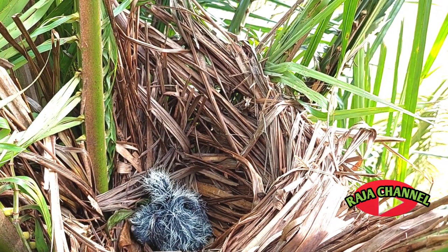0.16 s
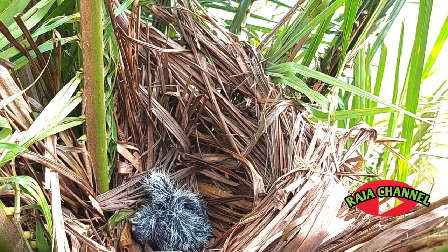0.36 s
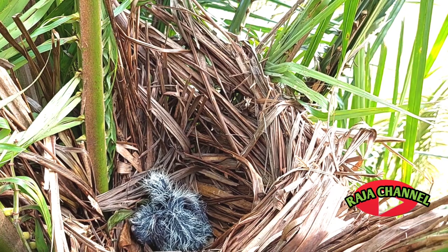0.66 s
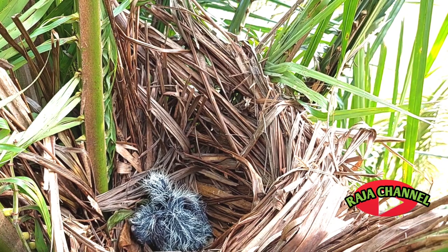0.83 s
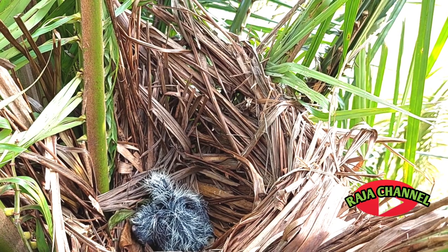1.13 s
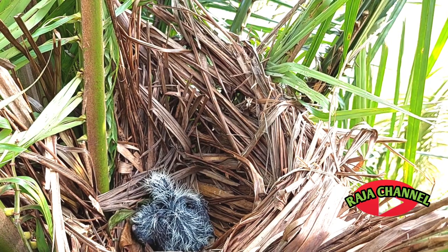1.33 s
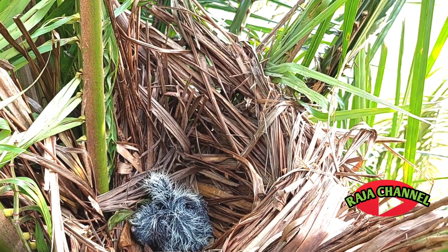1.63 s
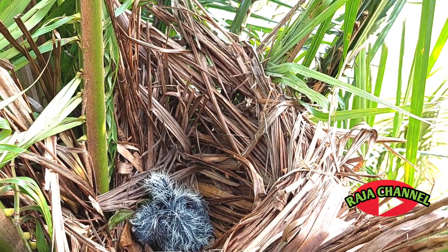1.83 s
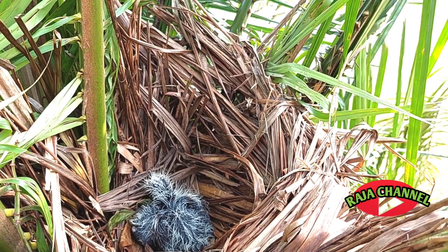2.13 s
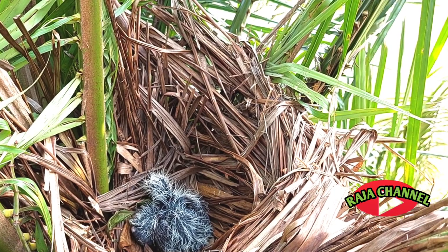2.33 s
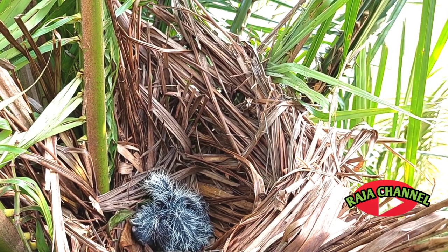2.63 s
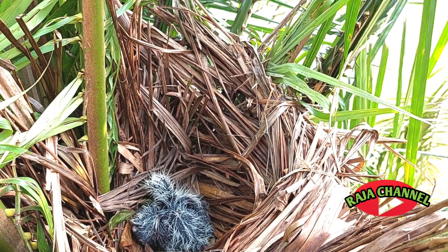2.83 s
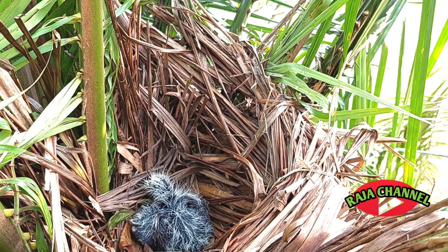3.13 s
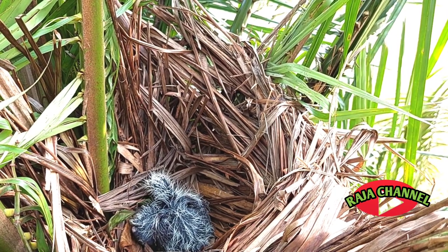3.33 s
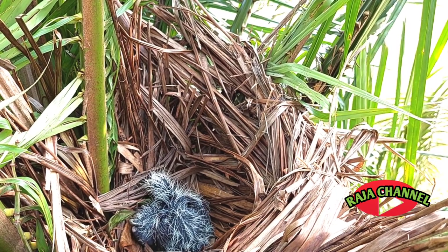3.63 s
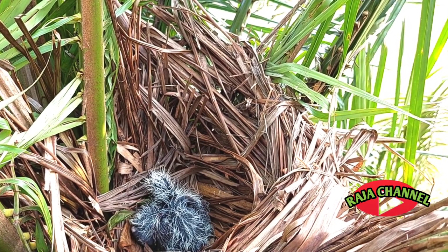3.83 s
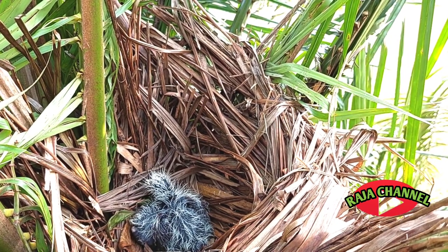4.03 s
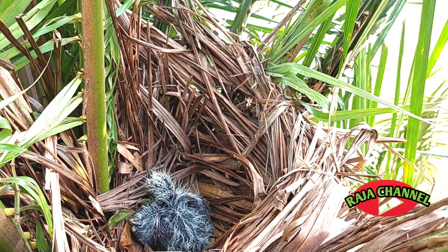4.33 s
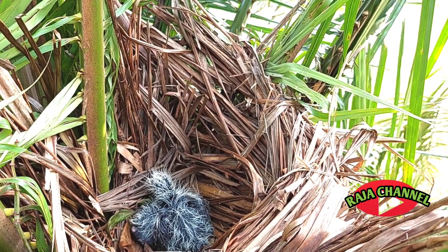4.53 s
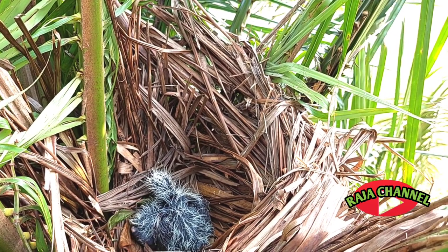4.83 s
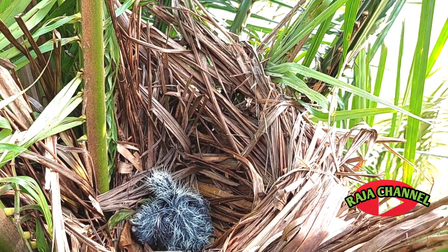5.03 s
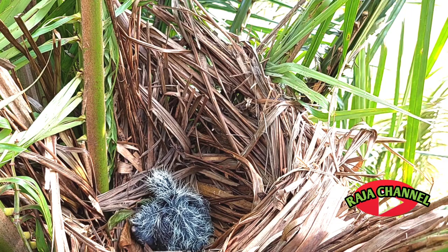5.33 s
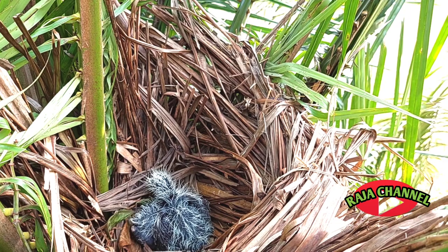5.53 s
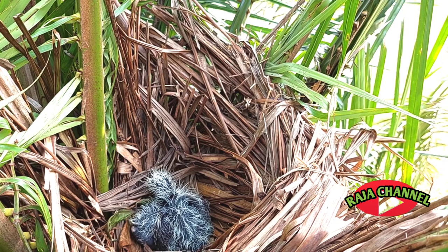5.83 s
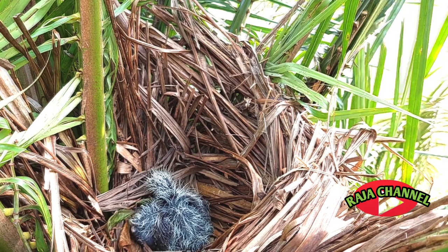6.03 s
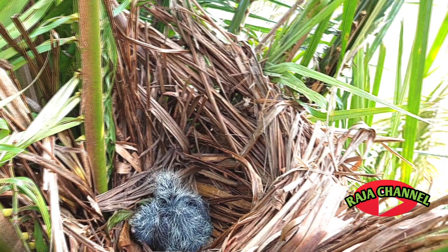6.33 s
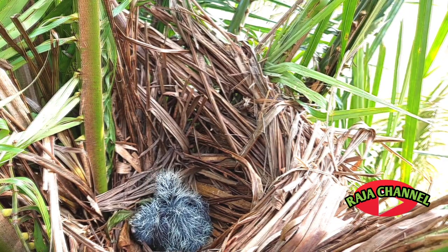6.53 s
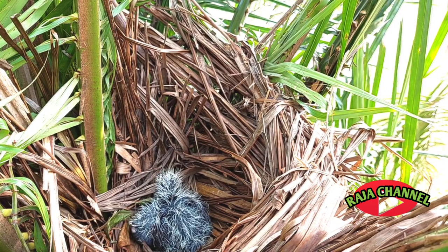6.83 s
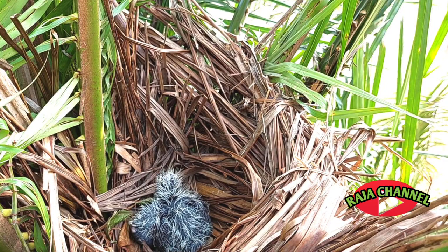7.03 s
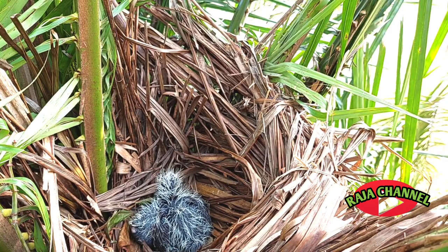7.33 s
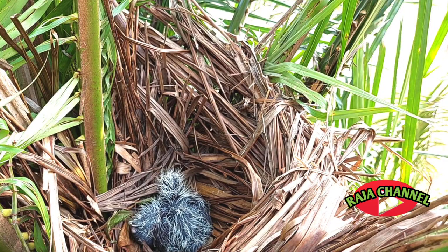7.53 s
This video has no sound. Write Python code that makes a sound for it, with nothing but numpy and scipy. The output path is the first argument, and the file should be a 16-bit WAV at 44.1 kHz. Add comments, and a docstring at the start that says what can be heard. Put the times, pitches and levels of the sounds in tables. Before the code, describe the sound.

Bright daytime thicket of shrill pulsing insects, with quickening runs of bird ticks, high double lisps, a few sharp dry crackles and faint low rumble.

```python
"""Palm thicket by day: two crickets chirp and a katydid buzzes in swelling phrases, all wing-stroke tone pulses.
One bird ticks in quickening runs, another lisps, others call from deeper in: gliding tones with tree echo.
Dry fronds snap and stems knock: decaying noise bursts. Behind lie trillers and a pulsing noise chorus,
then a low distant rumble with a wavering drone and a faint hiss of leaves."""
import sys
import numpy as np
from scipy import signal
from scipy.fft import rfft, irfft, next_fast_len
from scipy.io import wavfile
from scipy.ndimage import map_coordinates

SR = 44100
rng = np.random.default_rng(int(sys.argv[2]) if len(sys.argv) > 2 else 0)


def dump_mix(stems):
    """Bounce the given channels to the path in sys.argv[1] as a 16-bit WAV at rate SR."""
    frames = np.atleast_2d(stems).T  # one column per channel
    limited = np.clip(frames, -1, 1)  # hard clip at full scale
    pcm = np.round(limited * 32767).astype(np.int16)
    wavfile.write(sys.argv[1], SR, pcm)


N = 338247
TIME = np.arange(N) / SR


def amp(db):
    """Decibels to gain."""
    return 10 ** (np.asarray(db) / 20)


def unit(x):
    """Scale to rms 1."""
    return x / np.sqrt(np.mean(x ** 2) + 1e-20)


def along(points, hz):
    """Interpolate (f/Hz, value) points on a log frequency axis."""
    point_hz, values = np.transpose(points)
    return np.interp(np.log(hz + 1), np.log(point_hz + 1), values)


def curve(points):
    """Interpolate (t/s, value) points, one value per sample."""
    return np.interp(TIME, *np.transpose(points))


def wobble(rate_hz):
    """Smooth random curve with rate_hz knots a second."""
    knots = rng.standard_normal(int(N * rate_hz / SR) + 4)
    return map_coordinates(knots, [TIME * rate_hz])


def gate(start_s, end_s, edge_s):
    """Gain 1 between start and end, with linear edges centred on them."""
    return np.clip(np.minimum(TIME - start_s, end_s - TIME) / edge_s + .5, 0, 1)


def filtered(x, response):
    """Filter x by a gain that is a function of frequency."""
    m = next_fast_len(len(x) + 8192)
    return irfft(rfft(x, m) * response(np.fft.rfftfreq(m, 1 / SR)), m)[:len(x)]


def noise(spectrum):
    """Coloured noise of rms 1."""
    return unit(filtered(rng.standard_normal(N), lambda hz: amp(along(spectrum, hz))))


def band(centre_hz, octaves, size=N):
    """Noise of rms 1 in a band that is bell-shaped over log frequency."""
    def bell(hz):
        return np.exp(-.5 * (np.log2((hz + 1) / centre_hz) / octaves) ** 2)
    return unit(filtered(rng.standard_normal(size), bell))


def add(track, s, sound):
    """Mix a sound into the track from time s, cropped to the track."""
    i = round(s * SR)
    part = sound[max(-i, 0):max(N - i, 0)]
    track[max(i, 0):][:len(part)] += part


def echoed(x, echo_db):
    """Direct sound plus diffuse echo from the trees: noise whose decay depends on frequency."""
    # echo decay: f/Hz, t60/s
    trees = [(500, 0.37), (3000, 0.42), (10000, 0.072)]
    hz, t, z = signal.stft(rng.standard_normal(SR // 2), SR, nperseg=256)
    decay = amp(-60 * t / along(trees, hz)[:, None])
    tail = signal.istft(z * decay, SR)[1]
    path = amp(echo_db) * tail / np.linalg.norm(tail)
    path[0] += 1  # direct sound
    return signal.fftconvolve(x, path)


def lull(depth=1):
    """Gain of the lull that most of the insects share; depth scales its dB."""
    # lull at depth 1: t/s, level/dB
    lull_db = [(5.8, 0), (6.15, -1.8), (6.55, -6.8), (6.85, -5.8), (7.35, 0)]
    return amp(depth * curve(lull_db))


def wings(hz, rate, glide_hz, sharp, rough, octaves, drift=0.028, jitter=.007, uneven_db=1.0):
    """Stridulation of rms 1: each wing stroke is a gliding tone pulse, roughened by the file's uneven teeth."""
    stroke = np.cumsum(rate * (1 + drift * wobble(12))) / SR % 1  # position in the stroke, 0-1
    pulse = np.abs(np.sin(np.pi * stroke)) ** sharp * amp(uneven_db * wobble(rate))
    pitch_hz = hz * (1 + jitter * wobble(rate)) + glide_hz * (stroke - .5)
    tone = np.sqrt(2) * np.sin(2 * np.pi * np.cumsum(pitch_hz) / SR)
    return unit(pulse * (tone + rough * band(hz, octaves)))


def chirps(bouts, period_s, length_s, edge_s, vary_db=.3):
    """Level of flat-topped chirps, evenly spaced through each bout."""
    level = np.zeros(N)
    for first, last, db in bouts:
        count = round((last - first) / period_s) + 1
        for s in np.linspace(first, last, count):
            chirp_gain = amp(db + vary_db * rng.standard_normal())
            level += chirp_gain * gate(s - length_s / 2, s + length_s / 2, edge_s)
    return level


def crickets():
    """Two near crickets chirp, each at its own pace; the shrill one keeps stroking softly between chirps."""
    # chirp bouts: first chirp t/s, last chirp t/s, relative level/dB
    high_bouts = [(.036, 1.752, -42.7), (1.933, 6.461, -43.4), (6.62, 7.02, -52)]
    low_bouts = [(.11, 1.532, -48.6), (2.108, 2.93, -49.5), (3.31, 3.948, -49.6), (4.21, 5.63, -49),
                 (5.865, 7.62, -49.3)]
    high_period_s, low_period_s = .133, .16
    shrill = wings(7045, rate=97, glide_hz=700, sharp=2.5, rough=.45, octaves=.04,
                   drift=.06, jitter=.009, uneven_db=.9)
    rattle = wings(5490, rate=89, glide_hz=-750, sharp=3.5, rough=.7, octaves=.08,
                   drift=.02, jitter=.02, uneven_db=1)
    high = amp(-4.0) * chirps(high_bouts, high_period_s, length_s=0.074, edge_s=0.035)
    high += amp(-19) * chirps(high_bouts, high_period_s, length_s=0.25, edge_s=0.044)  # soft strokes between
    low = amp(.2) * chirps(low_bouts, low_period_s, length_s=0.074, edge_s=0.027)
    return echoed(lull() * (high * shrill + low * rattle), echo_db=-9)[:N]


def katydid():
    """Each phrase of very even strokes starts softly, swells and stops dead."""
    # phrases: start t/s, end t/s
    phrases = [(-.25, .058), (.636, .939), (1.253, 1.603), (2.032, 2.352), (2.659, 3.011), (3.293, 3.648),
               (3.92, 4.284), (4.566, 4.902), (5.236, 5.595), (5.873, 6.243), (6.473, 6.86)]
    base_db, lull_depth = -47.8, 1.4
    level = np.zeros(N)
    for start, end in phrases:
        swell_db = np.interp(TIME - start, [0, .08, .15], [-11, -6.5, 0.5])
        level += amp(base_db + swell_db) * (TIME > start) * (TIME < end)
    buzz = wings(11280, rate=143, glide_hz=-500, sharp=1.8, rough=.3, octaves=.04,
                 drift=.008, jitter=.004, uneven_db=.5)
    rasp = amp(-9.5) * band(10780, octaves=0.026)  # the wing also scrapes just under its resonance
    return echoed(level * lull(lull_depth) * (buzz + rasp), echo_db=-16)[:N]


def whistle(shape, ratio=1, vary=0.00812, overtone_db=-60, order=2):
    """One bird note gliding through its shape, with slight random pitch offset and one weak overtone."""
    s, hz, db = np.transpose(shape)
    t = np.arange(s[0], s[-1], 1 / SR)
    pitch_hz = np.interp(t, s, hz) * ratio * (1 + vary * rng.standard_normal())
    phase = 2 * np.pi * np.cumsum(pitch_hz) / SR
    tone = np.sin(phase) + amp(overtone_db) * np.sin(order * phase)
    return np.sqrt(2) * amp(np.interp(t, s, db)) * tone


def tick_times(climax, opening_gap, after_gap, count=20):
    """Ticks quicken into a rush up to the climax, then slow down one by one."""
    rush_gap_s, rush_ticks, quicken_ticks = .034, 5.83, 2.47  # rush gap, ticks in rush, ticks to reach it
    tire_s = .0013  # growth of each gap after the climax
    k = np.arange(count)
    gaps_before = np.interp(k, [rush_ticks, rush_ticks + quicken_ticks], [rush_gap_s, opening_gap])
    before = np.cumsum(gaps_before)
    after = np.cumsum(after_gap + tire_s * k)
    return climax + np.concatenate([-before[::-1], [0], after])


def ticking_bird():
    """Runs of falling ticks; toward the loud peak of a run a higher lead-in note joins each tick."""
    # runs: start t/s, climax t/s, end t/s, opening gap/s, first gap after climax/s, opening relative level/dB
    runs = [(-.1, -.492, .26, .05, .047, -60), (.74, 1.116, 1.74, .039, .0475, -62),
            (2.42, 2.8905, 3.72, .053, .0489, -60), (3.73, 4.1485, 4.43, .0573, .0472, -55),
            (5.44, 5.777, 6.44, .0423, .0463, -63.5), (6.47, 7.324, 7.68, .0554, .0512, -59.5),
            (6.44, 7.46, 7.1, .06, .05, -63.5)]
    # relative level of every run: t from climax/s, level/dB
    run_level = [(-.13, -48), (-.03, -45.5), (.1, -50), (.8, -55)]
    # note shapes, before gain and pitch ratio: t/s, f/Hz, level/dB
    tick = [(-.013, 3420, -27), (-.005, 3290, -9), (0, 3213, -4), (.004, 3100, -6.5), (.01, 2900, -33)]
    lead_in = [(0, 3640, -24), (.003, 3540, -3), (.009, 3430, -4), (.014, 3450, -24)]
    swell_s = .33  # swell starts this long before the climax
    track = np.zeros(N)
    for start, climax, end, opening_gap, after_gap, opening_db in runs:
        times = tick_times(climax, opening_gap, after_gap)
        course = np.transpose([(-swell_s, opening_db), *run_level])
        levels_db = np.interp(times - climax, *course) + .5 * rng.standard_normal(len(times))
        for s, db in zip(times, levels_db):
            if start < s < end:
                note = whistle(tick, ratio=1.007, vary=.008, overtone_db=-19.5, order=3)
                add(track, s + tick[0][0], amp(db + .7) * note)
                effort = np.clip((db + 53.5) / 8, 0, 1)
                add(track, s - .016, amp(db - 5.5) * effort * whistle(lead_in))
    return echoed(track, echo_db=-12)[:N]


def songbirds():
    """High lisps close by; a repeated warble, low whistled calls and faint slurs further off."""
    # double lisps: t/s, relative level/dB
    lisps = [(0.27, -48.5), (0.799, -44), (1.31, -45.5), (1.906, -45.5), (2.457, -45), (2.914, -46),
             (3.447, -43.5), (3.985, -42.5), (4.5, -43.5), (5.09, -43), (5.637, -44.5), (6.158, -46.5),
             (6.65, -51)]
    # warbled phrases: t/s, relative level/dB, pitch ratio
    warbles = [(1.155, -60.5, 1.05), (1.508, -58.5, 0.96), (1.864, -61, 0.95), (2.224, -62, 0.94),
               (2.59, -61, .99), (2.974, -63, 0.97)]
    # whistled calls, long from afar, brief from nearer: t/s, motif, relative level/dB, echo level/dB
    whistles = [(.226, "long", -63, -.5), (3.365, "long", -64, -.5), (5.437, "brief", -44.6, -13),
                (6.944, "brief", -52, -12)]
    # motifs: t from start/s, note shape, relative level/dB, pitch ratio
    motifs = {"long": [(0, "waver", 1, .985), (.147, "short", -2.5, .945), (.22, "waver", -5, .97),
              (.297, "short", -2, .95), (.403, "arch", -1, .995), (.59, "arch", -.5, .985)],
              "brief": [(0, "waver", -1.5, .99), (.169, "short", .5, .98), (.26, "arch", 0, 1)]}
    # faint slurred notes of far birds: t/s, length/s, start f/Hz, end f/Hz, level/dB
    slurs = [(.53, 0.018, 2330, 3170, -68), (.63, .07, 3450, 3200, -77), (0.787, 0.04, 2680, 3050, -66.5),
             (3.22, 0.063, 815, 795, -74), (3.412, 0.089, 559, 588, -71.5), (3.475, 0.062, 2400, 2780, -67),
             (3.655, 0.052, 704, 670, -77), (4.196, .16, 640, 533, -76), (5.223, 0.071, 790, 706, -72),
             (5.78, 0.105, 491, 564, -69.5), (6.028, 0.066, 660, 605, -75.5), (6.298, 0.096, 535, 590, -74)]
    # note shapes, before gain and pitch ratio: t/s, f/Hz, level/dB
    lisp = [(-.029, 6900, -35), (-.022, 6500, 1), (-.017, 6170, -14), (-.015, 6940, -18),
            (-.009, 6400, 1.5), (-.003, 5850, -5), (0, 6800, -6), (.006, 6300, 2.5), (.012, 5950, -8),
            (.02, 5300, -27), (.024, 5100, -37)]
    warble = [(0, 2197, -25), (.02, 2720, -0.5), (.038, 2973, -21), (.075, 3030, -14), (.095, 2317, -6.5),
              (.115, 1830, -16.5), (.14, 1800, -30), (.178, 2100, -16), (.2, 2650, -2.5), (.22, 2180, -2),
              (.24, 2400, -57), (.265, 1910, -18.5), (.288, 2300, 3.5), (.305, 2360, -23)]
    hoots = {"waver": [(0, 894, -16), (.008, 960, -2.5), (.025, 1020, 3), (.033, 1220, 0),
             (.048, 1260, -17.5), (.068, 1200, 4.5), (.086, 1240, -10.5), (.1, 1110, -4), (.113, 1100, 5),
             (.134, 1200, 2), (.152, 1020, -7), (.163, 950, -28)], "short": [(0, 899, -19),
             (.009, 917, -5.5), (.019, 1043, 6.5), (.029, 1167, 2.5), (.042, 1050, -7.5), (.055, 890, -14)],
             "arch": [(0, 873, -12), (.012, 953, 6), (.026, 1129, -4), (.045, 1141, 4.5),
             (.064, 1115, -3.5), (.08, 1031, 3.5), (.092, 990, -26)]}
    track = np.zeros(N)
    for s, db in lisps:
        note = amp(db + 3.0) * whistle(lisp, overtone_db=-21.5)
        add(track, s + lisp[0][0], echoed(note, echo_db=-4.5))
    for s, db, ratio in warbles:
        note = amp(db) * whistle(warble, ratio, vary=0.0156)
        add(track, s, echoed(note, echo_db=-1))
    for s, motif, db, echo_db in whistles:
        for delay, shape, note_db, ratio in motifs[motif]:
            note = amp(db + note_db) * whistle(hoots[shape], ratio)
            add(track, s + delay, echoed(note, echo_db))
    for s, length, start_hz, end_hz, db in slurs:
        note = whistle([(0, start_hz, db), (length, end_hz, db)])
        add(track, s, echoed(note * signal.windows.tukey(len(note)), echo_db=-4.5))
    return track


def nasal_call():
    """One short faint far call, carried by its second and third partials arching together."""
    # fundamental: t/s, f/Hz, relative level/dB
    nasal = [(0, 520, -16), (.015, 596, -1), (.033, 656, 0), (.05, 630, -11), (.065, 520, -20)]
    track = np.zeros(N)
    call = amp(-72) * whistle(nasal, ratio=2) + amp(-74) * whistle(nasal, ratio=3)
    add(track, 6.46, call)
    return echoed(track, echo_db=-14)[:N]


def fronds():
    """Dry fronds snap and stems knock: short bursts of band noise with exponential decay."""
    # bursts: t/s, level/dB, t60/s, centre f/Hz, width/octaves
    snaps = [(1.52, -30.5, 0.017, 9300, .45), (1.528, -47, .07, 7000, 0.39),
             (1.744, -31, 0.037, 10500, 0.93), (1.755, -51, 0.2, 3000, 2.9),
             (1.811, -38.5, 0.067, 10850, .9), (1.91, -55, 0.028, 2500, 0.73), (3.67, -52, .05, 12400, .3),
             (1.157, -45, 0.062, 993, 0.14), (1.165, -57, 0.18, 232, 0.2), (1.188, -50.5, 0.073, 906, 0.11),
             (1.36, -63.5, 0.12, 790, 0.31), (1.425, -59, .1, 840, 0.17), (1.75, -56.5, 0.18, 502, 0.48),
             (3.862, -53, .1, 966, 0.18), (3.863, -59, 0.059, 1600, 0.17)]
    track = np.zeros(N)
    t = np.arange(SR // 4) / SR
    for s, db, t60, centre_hz, octaves in snaps:
        decay = np.exp(-np.log(1000) * t / t60)
        add(track, s, amp(db) * decay * band(centre_hz, octaves, size=len(t)))
    return echoed(track, echo_db=-9)[:N]


def chorus():
    """Trillers, a far katydid and cricket, and many far insects merged into a pulsing sizzle of noise."""
    # spells of the low triller: start t/s, end t/s, relative level/dB
    trills = [(-.1, .76, -58), (1.35, 3.12, -57.8), (3.42, 4.23, -59.5), (4.53, 6.03, -58),
              (6.65, 7.48, -59)]
    # high triller joins in: t/s, level/dB
    high_trill = [(1.1, -71), (1.7, -62.5), (5, -61)]
    # far katydid idles, then buzzes steadily: t/s, level/dB
    far_katydid_level = [(0, -65), (3.2, -70.5), (6.3, -70), (7.15, -57.5)]
    # sizzle spectrum: f/Hz, relative level/dB
    sizzle_spectrum = [(3800, -41), (4400, -14), (4850, -8), (5200, -7), (5600, -6), (5950, -5), (6300, -4),
                       (6800, 4), (7200, -1), (7550, -18), (8300, -21.5), (9000, -60)]
    start_db, fade_db_per_s = -51.9, .2
    far_db = start_db - fade_db_per_s * TIME
    spells = sum(amp(db) * gate(start, end, edge_s=.1) for start, end, db in trills)
    low = amp(-5) * spells * wings(4510, rate=70, glide_hz=-200, sharp=0.69, rough=1.0, octaves=0.021)
    middle = amp(far_db - 9.5) * wings(5150, rate=77, glide_hz=-150, sharp=4.2, rough=0.85, octaves=0.01)
    high = amp(curve(high_trill)) * wings(8060, rate=66, glide_hz=148, sharp=0.45, rough=0.5,
                                          octaves=0.0083, jitter=.006)
    far_katydid = amp(curve(far_katydid_level)) * wings(10780, rate=135, glide_hz=-500, sharp=.8,
                                                        rough=2.5, octaves=.04)
    far_cricket = amp(far_db - 1.5) * wings(6780, rate=83, glide_hz=753, sharp=1.3, rough=0.58,
                                            octaves=0.096, drift=.04)
    sizzle_db = far_db + 2.5 + 1.4 * wobble(8.1) + 2.1 * wobble(230)
    sizzle = amp(sizzle_db) * noise(sizzle_spectrum)
    return far_katydid + lull(depth=.9) * (low + middle + high + far_cricket + sizzle)


def air():
    """Distant rumble with a wavering drone in it, and a faint hiss of leaves."""
    # rumble course, before trim: t/s, level/dB
    rumble_level = [(0.0, -64), (0.04, -59), (0.21, -55), (1.37, -61), (1.77, -53), (1.9, -63), (2.2, -54),
                    (2.29, -62), (3.2, -53), (3.53, -61), (4.36, -54), (4.76, -63), (4.8, -57), (5.77, -52),
                    (6.11, -61), (7.07, -62), (7.35, -57), (7.67, -63)]
    # noise spectra: f/Hz, relative level/dB
    rumble_spectrum = [(15, -46), (30, -17), (45, -12), (60, -4), (85, 0), (145, -0.5), (185, -15),
                       (280, -17.5), (420, -30), (1000, -48.5)]
    hiss_spectrum = [(200, 10), (550, 2.5), (900, 0), (1600, -4.5), (3800, -9.5), (8000, 0), (9500, -2.5),
                     (12000, 4), (13800, 0.5), (15500, 1)]
    level_db = curve(rumble_level)
    rumble = amp(level_db - 1.4) * noise(rumble_spectrum)
    drone_hz = 60 + 2.39 * wobble(8)
    tone = np.sqrt(2) * np.sin(2 * np.pi * np.cumsum(drone_hz) / SR)
    drone_db = -62.8 + 1.5 * (level_db - level_db.mean())  # swings wider than the rumble
    drone = amp(drone_db) * unit(tone + 1.3 * band(58.7, octaves=0.23))
    hiss = amp(-59.7 + 0.89 * wobble(25)) * lull(depth=.9) * noise(hiss_spectrum)  # dips with the insects
    return drone + rumble + hiss


def scene():
    """Everything as it reaches one microphone."""
    insects = crickets() + katydid() + chorus()
    birds = ticking_bird() + songbirds() + nasal_call()
    return (insects + birds + fronds() + air())[None]


def record(dry):
    """The recorder keeps nothing above its band limit."""
    top_hz = 15550
    return np.array([filtered(x, lambda hz: hz < top_hz) for x in dry])


dry = scene()
out = record(dry)
dump_mix(out)
```